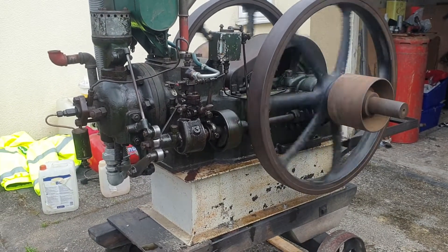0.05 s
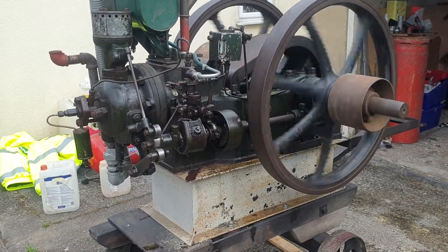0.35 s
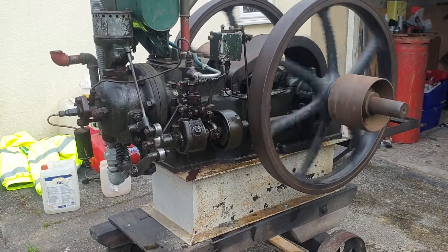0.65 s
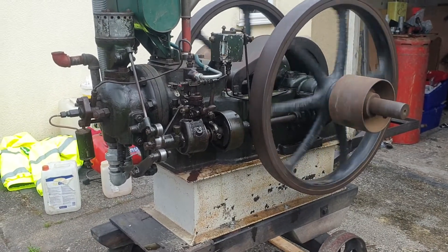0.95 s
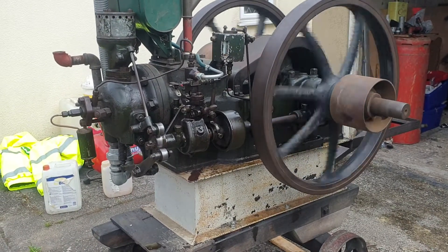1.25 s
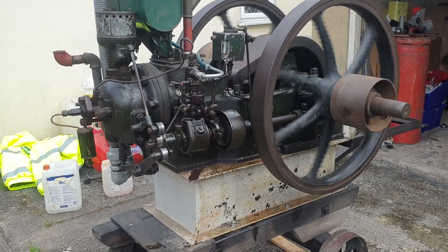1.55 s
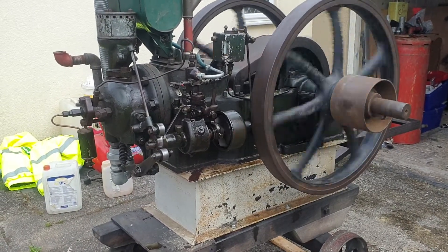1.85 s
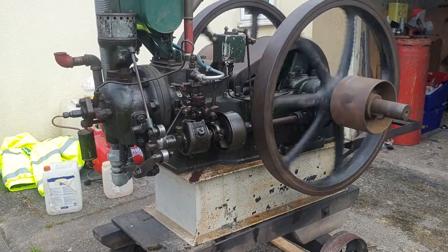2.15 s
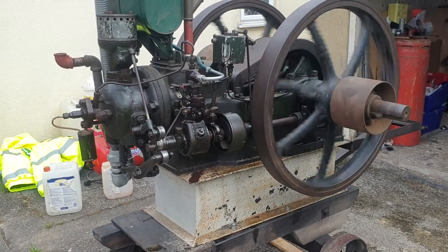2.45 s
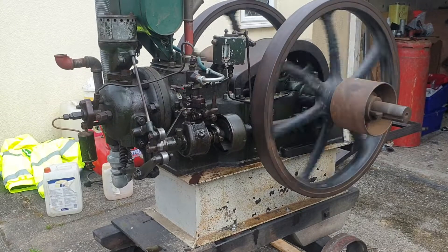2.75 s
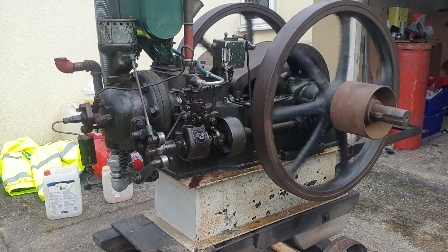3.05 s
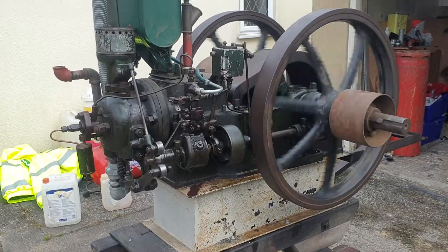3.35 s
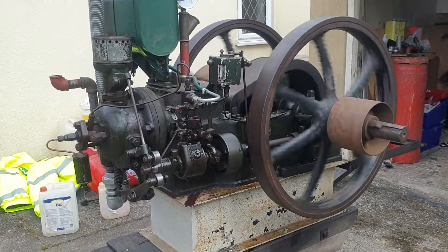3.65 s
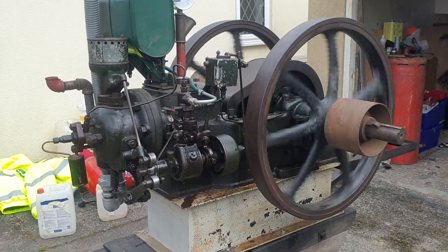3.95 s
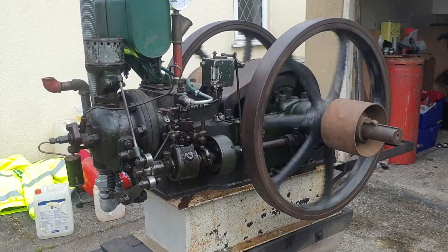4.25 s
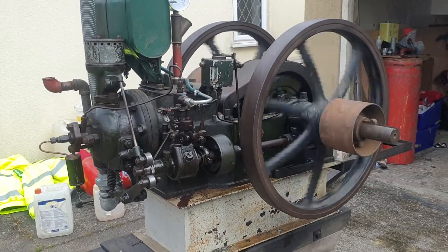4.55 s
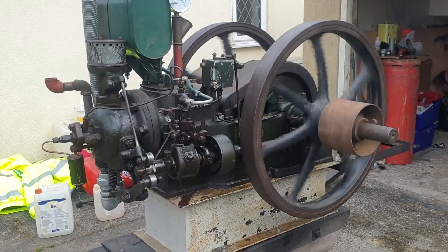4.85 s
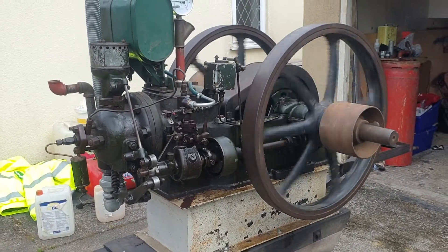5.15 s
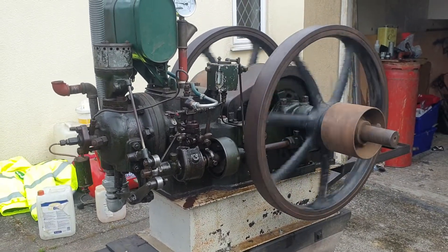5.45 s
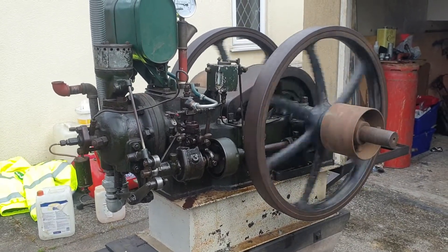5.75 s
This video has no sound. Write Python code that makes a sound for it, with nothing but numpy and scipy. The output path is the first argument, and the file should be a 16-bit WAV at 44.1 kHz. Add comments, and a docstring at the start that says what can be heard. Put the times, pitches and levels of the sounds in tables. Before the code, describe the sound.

Close to the microphone, a stationary diesel engine chugs at a steady idle from start to finish. Its single cylinder repeats a quick pattern of ringing knock, exhaust chuff, intake gulp and clunk, over a continuous rattle and small steel clinks. Now and then one firing knocks harder than the others. The sound sits slightly left, with light reflections from the surrounding yard.

```python
"""An old single-cylinder four-stroke diesel idles evenly, close by, in a yard.
Each cycle: the firing knocks the iron frame; the exhaust valve opens with a thud, gas rushes out
through the pipe and the valve shuts; the inlet gulps and hisses; its valve seats with a clunk.
Throughout, the gear clicks, rattles and clinks, the knock swells and eases as the governor hunts,
and the walls throw it all back."""
import sys
import numpy as np
from scipy import signal
from scipy.fft import rfft, irfft, next_fast_len
from scipy.io import wavfile
from scipy.ndimage import uniform_filter1d

SR = 44100
rng = np.random.default_rng(int(sys.argv[2]) if len(sys.argv) > 2 else 0)


def to_wav(s):
    """Save 16-bit WAV."""
    ch = np.atleast_2d(s).T  # columns
    pcm = np.round(np.clip(ch, -1, 1) * 32767)  # PCM
    wavfile.write(sys.argv[1], SR, pcm.astype(np.int16))


N = 265041
TAPS = 8192
HZ = np.fft.rfftfreq(TAPS, 1 / SR)
AGE_S = np.arange(SR // 2) / SR
RPM = 409.48  # held by the flywheels
CYCLE_S = 2 * 60 / RPM  # one firing in two turns
FIRINGS_S = np.arange(-.0452, N / SR, CYCLE_S)

# Resonances of rods, rockers and springs. Each row: centre in Hz, width in Hz, peak in dB.
STEEL_PEAKS = [(2170, 66, -0.5), (2870, 27, -1), (3270, 28, 10), (3770, 59, 6), (4340, 80, -1),
               (5460, 108, 2.5), (7220, 600, 7.5), (11400, 590, 4.5)]


def amp(db):
    """Decibels to gain."""
    return 10 ** (np.asarray(db) / 20)


def curve(points, hz=HZ):
    """Interpolate a table over log frequency."""
    points_hz, values = np.transpose(points)
    return np.interp(np.log(hz + 1), np.log(points_hz + 1), values)


def add(mix, start_s, sound):
    """Mix a sound in, cut to fit."""
    start = round(start_s * SR)
    sound = sound[max(-start, 0):]
    part = mix[max(start, 0):][:len(sound)]
    part += sound[:len(part)]


def delayed(x, delay_s):
    """Delay by whole samples."""
    return np.interp(np.arange(N) - round(delay_s * SR), np.arange(N), x)


def colour(x, gain):
    """Minimum-phase filter with the given gain at each of HZ."""
    log_gain = np.log(np.maximum(np.r_[gain, gain[-2:0:-1]], 1e-5))
    taps = np.fft.ifft(np.exp(np.conj(signal.hilbert(log_gain)))).real
    return signal.oaconvolve(x, taps[:TAPS // 2])[:len(x)]


def resonant(broad_db, peaks):
    """Broad spectrum with resonances standing on it, at unit power."""
    peak_power = sum(amp(db) ** 2 / (1 + (2 * (HZ - hz) / width_hz) ** 2) for hz, width_hz, db in peaks)
    gain = amp(broad_db) * np.sqrt(1 + peak_power)
    return gain / np.sqrt(np.mean(gain ** 2))


def ring(modes, phases, rise_s, scatter_db):
    """One blow on damped modes, each at a slightly random level."""
    hz, db, t60_s = np.transpose(modes)[:, :, None]
    decay = amp(db + scatter_db * rng.standard_normal(db.shape) - 60 * AGE_S / t60_s)
    return (decay * np.cos(2 * np.pi * hz * AGE_S + phases)).sum(0) * (1 - np.exp(-AGE_S / rise_s))


def swell(full_s, db, attack_db_per_s, hold_s, release_db_per_s):
    """Attack, hold and release, as gain over the time since a firing."""
    early_s, late_s = np.maximum(full_s - AGE_S, 0), np.maximum(AGE_S - full_s - hold_s, 0)
    return amp(db - attack_db_per_s * early_s - release_db_per_s * late_s)


def scatter(spread_db):
    """A random level in dB per cycle."""
    return spread_db * rng.standard_normal(len(FIRINGS_S))


def lumpy_noise(envelope, levels_db, grain_db, repeat_share):
    """One grainy burst per cycle; a share of the noise is the same each time."""
    out = np.zeros(N)
    repeated = rng.standard_normal(len(AGE_S))
    for firing_s, db in zip(FIRINGS_S, levels_db):
        fresh, lumps = rng.standard_normal((2, len(AGE_S)))
        lumps = uniform_filter1d(lumps, size=40)
        lumps = amp(grain_db * lumps / lumps.std())
        noise = np.sqrt(repeat_share) * repeated + np.sqrt(1 - repeat_share) * fresh
        add(out, firing_s, amp(db) * envelope * noise * lumps / np.sqrt(np.mean(lumps ** 2)))
    return out


def yard(x, first_s=.003, echoes_per_s=3000):
    """Scattered reflections from ground, walls and garage, different at each microphone port."""
    # Reverberation time. Each row: frequency in Hz, T60 in seconds.
    reverb_t60_s = [(100, 1.0), (1000, .8), (2500, .38), (12000, 0.33)]
    # Reflection strength. Each row: frequency in Hz, level in dB.
    reflection_db = [(100, -40), (300, -15), (1000, -11), (3000, -14.5), (12000, -14)]
    shape = (2, len(AGE_S))
    echoes = rng.standard_normal(shape) * (rng.random(shape) < echoes_per_s / SR) * (AGE_S > first_s)
    hz, time_s, spectra = signal.stft(echoes, SR, nperseg=256)
    decay = amp(-60 * time_s / curve(reverb_t60_s, hz)[:, None])
    decay *= amp(curve(reflection_db, hz))[:, None] / np.sqrt(np.mean(decay ** 2, 1, keepdims=True))
    tail = signal.istft(spectra * decay, SR, nperseg=256)[1] / np.linalg.norm(echoes[0])
    return signal.fftconvolve(x[None], tail, axes=1)[:, :N]


def gear_shake(tremble_db=-44):
    """Envelope of one cycle: jolts die away over a steady tremble."""
    # Jolts from firing, exhaust tappet, inlet tappet and closing inlet valve. Each row: seconds
    # after firing, level in dB, attack in dB/s, hold in seconds, release in dB/s.
    jolts = [(0.0, -22, 6000, .006, 135), (.072, -22.8, 330, .004, 240), (.15, -27.5, 60, .012, 150),
             (.238, -30.5, 900, .008, 480)]
    tremble = amp(tremble_db) * (AGE_S < CYCLE_S)
    return np.sqrt(tremble ** 2 + sum(swell(*jolt) ** 2 for jolt in jolts))


def gear_rattle(gain_db=-1.4):
    """Loose gears and rods rattle all round the cycle."""
    # Broad rattle spectrum. Each row: frequency in Hz, relative level in dB.
    rattle_db = [(30, -1), (130, 4.5), (450, 5.5), (650, -0.5), (1000, 1), (1500, -5), (2600, -4),
                 (4000, -8), (5600, -6), (7500, -18), (9000, -19.5), (16000, -31.5)]
    chatter = lumpy_noise(gear_shake(), np.full(len(FIRINGS_S), gain_db), grain_db=2, repeat_share=.15)
    return colour(chatter, resonant(curve(rattle_db), STEEL_PEAKS))


def steel_clinks(hits_per_s=26, scatter_db=3):
    """Small parts are struck at random, hardest during jolts; each rings at its own pitch."""
    # Small steel parts. Each row: pitch in Hz, level in dB, T60 in seconds.
    parts = [(2885, -29, .05), (3256, -28, .05), (3735, -24, .11), (3838, -24, .1), (4350, -28, .05),
             (5450, -27, .05), (5680, -25, .07), (10900, -29, .025)]
    force, out, shake = np.zeros(N), np.zeros(N), gear_shake()
    for firing_s in FIRINGS_S:
        add(force, firing_s, (shake / shake.max()) ** 1.6)
    for hz, db, t60_s in parts:
        hits = force * (rng.random(N) < hits_per_s / SR)
        hits *= amp(scatter_db * np.clip(rng.standard_normal(N), -2, 2))
        clink = amp(db - 60 * AGE_S / t60_s) * np.sin(2 * np.pi * hz * AGE_S)
        out += signal.oaconvolve(hits, clink)[:N]
    return out


def gear_clicks(parts_db, scatter_db=1, rise_s=.00084, cutoff_hz=13000):
    """Pump, tappets and valves click at fixed crank angles."""
    # Clicks. Each row: seconds after firing, relative level in dB, centre in Hz, width in octaves,
    # T60 in seconds, part whose strength it follows.
    clicks = [(-.0022, -23.5, 5800, 1.1, .04, "knock"), (.001, -21, 1100, 0.35, 0.13, "knock"),
              (.021, -21.5, 4000, 0.54, 0.026, "valve"), (.028, -35, 11000, 0.334, .025, "tappet"),
              (0.0692, -18, 3800, 0.28, 0.036, "tappet"), (0.1449, -23, 10700, 0.4, 0.056, "valve"),
              (0.2314, -15.8, 7400, 0.8, 0.031, "valve"), (.235, -27, 4500, 1.9, 0.048, "valve"),
              (0.273, -30.5, 3560, 0.4, 0.054, "tappet")]
    out, age_s = np.zeros(N), AGE_S[:TAPS]
    lowpass_db = -10 * np.log10(1 + (HZ / cutoff_hz) ** 16)
    for delay_s, db, hz, octaves, t60_s, part in clicks:
        hits = np.zeros(N)
        envelope = amp(db - 60 * age_s / t60_s) * (1 - np.exp(-age_s / rise_s))
        for firing_s, part_db in zip(FIRINGS_S, parts_db[part]):
            strength = amp(part_db + scatter_db * rng.standard_normal())
            add(hits, firing_s + delay_s, strength * envelope * rng.standard_normal(TAPS))
        band_db = -20 * np.log10(1 + (np.log2((HZ + 1) / hz) / octaves) ** 2 / 2)
        out += colour(hits, resonant(band_db + lowpass_db, STEEL_PEAKS))
    return out


def inlet_clunk(delay_s=.231):
    """The inlet valve drops onto its seat and rings the casting."""
    # Casting modes. Each row: frequency in Hz, level in dB, T60 in seconds.
    modes = [(119.4, -25, 0.22), (184, -30, 0.27), (250.3, -28, 0.28), (494.5, -33, 0.16),
             (622.4, -28, .08), (915, -35, .08), (2219.5, -28, 0.054)]
    out, phases = np.zeros(N), rng.uniform(0, 2 * np.pi, (len(modes), 1))
    for firing_s in FIRINGS_S:
        add(out, firing_s + delay_s, ring(modes, phases, rise_s=.00064, scatter_db=3))
    return out


def gas_flow(flow_db, crossover_hz=2600):
    """The piston drives gas out through the pipe, then draws air in."""
    # Resonances of pipe and cylinder head. Each row: centre in Hz, width in Hz, peak in dB.
    pipe_peaks = [(400, 53, 8), (600, 13, 7.5), (735, 20, 18.3), (847.5, 22, 18), (936, 38, 17.3),
                  (1072, 28, 17), (1272, 29, 11), (1417, 24, 9), (1875, 35, 11), (1995, 55, 11.8),
                  (2217, 52, 11), (2380, 33, 7.5), (3403, 19, 9), (3550, 23, 10), (4070, 23, 5),
                  (4330, 35, 7.5), (5575, 63, 11)]
    # Broad spectra of the two flows. Each row: frequency in Hz, relative level in dB.
    exhaust_db = [(40, -26), (130, -3), (300, -2.5), (550, -8), (850, -7), (1650, -7), (2900, -6.5),
                  (3700, -0.5), (4900, -5.5), (6300, -7), (7200, -4.5), (9300, -18.5), (11500, -19.5),
                  (16000, -35)]
    inlet_db = [(40, 7), (150, 1.5), (550, -0.5), (1000, -20.5), (1700, -6.5), (2800, 0), (4200, 5.5),
                (6000, -5.5), (7500, 5), (9000, -12), (11300, -4.5), (16000, -26)]
    exhaust = swell(full_s=.118, db=-12.4, attack_db_per_s=720, hold_s=.016, release_db_per_s=590)
    inlet = swell(full_s=.172, db=-25.3, attack_db_per_s=600, hold_s=.025, release_db_per_s=700)
    pipe = resonant(curve(exhaust_db), pipe_peaks)
    intake = resonant(curve(inlet_db), pipe_peaks)
    low_share = 1 / (1 + (HZ / crossover_hz) ** 4)
    pipe_low, pipe_high = pipe * np.sqrt(low_share), pipe * np.sqrt(1 - low_share)
    roar = colour(lumpy_noise(exhaust, flow_db, grain_db=1.64, repeat_share=.12), pipe_low)
    jet = colour(lumpy_noise(exhaust, flow_db, grain_db=2, repeat_share=.098), pipe_high)
    hiss = colour(lumpy_noise(inlet, flow_db, grain_db=2.3, repeat_share=.05), intake)
    # The late jet brightens the rush as the valve gap narrows.
    return roar + delayed(jet, delay_s=.005) + hiss


def puff(delay_s, width_s, push_db, lean, column, column_db, lead_s):
    """A valve moves: one pressure swing, and the air column rings from lead_s before its centre."""
    out, centre_s = np.zeros(N), .01
    widths = (AGE_S - centre_s) / width_s
    swing = -widths * np.exp((1 - widths ** 2) / 2 - lean * widths)  # lean favours the first half
    for firing_s in FIRINGS_S:
        add(out, firing_s + delay_s - centre_s, amp(push_db) * swing)
        ringing = ring(column, phases=0, rise_s=.0025, scatter_db=1.1)
        add(out, firing_s + delay_s - lead_s, amp(column_db) * ringing)
    return out


def inlet_gulp():
    """The inlet valve opens and sets its air column ringing."""
    # Inlet air column modes. Each row: frequency in Hz, relative level in dB, T60 in seconds.
    modes = [(77.4, -22.5, 0.3), (95, -27, 0.27), (126.48, -33.5, 0.35), (167.2, -20.5, 0.38),
             (220.7, -18, 0.11), (244, -24, 0.17), (272, -29, 0.074)]
    return puff(delay_s=.1514, width_s=.00094, push_db=-8.5, lean=.25,
                column=modes, column_db=.5, lead_s=.0011)


def exhaust_thuds():
    """The exhaust valve opens, then shuts more softly with the opposite pressure swing."""
    # Exhaust air column modes. Each row: frequency in Hz, relative level in dB, T60 in seconds.
    modes = [(74.4, -21.5, 0.128), (118.5, -31.5, 0.45), (230, -17.5, 0.093)]
    opening = puff(delay_s=.0662, width_s=.0011, push_db=-13.5, lean=.23,
                   column=modes, column_db=-2.8, lead_s=.0012)
    closing = puff(delay_s=.1437, width_s=.00092, push_db=-20, lean=0,
                   column=modes, column_db=-4.5, lead_s=.0014)
    return closing - opening


def firing_strength(base_db=-3, hunt_db=2.4, hunt_period_s=2.44, most_fuel_s=2.4):
    """Level of each firing in dB: the governor hunts slowly, with a sharper knock now and then."""
    # Harder firings. Each row: time in seconds, extra level in dB.
    hard_knocks = [(.248, 2.5), (.834, 3), (1.42, 5.5), (2.299, 4), (2.885, 6.5), (3.178, 6), (4.057, 4.3),
                   (4.643, 2.5), (5.23, 4.5)]
    governor_db = hunt_db * np.cos(2 * np.pi * (FIRINGS_S - most_fuel_s) / hunt_period_s)
    extra_db = sum(db * (abs(FIRINGS_S - time_s) < CYCLE_S / 2) for time_s, db in hard_knocks)
    return base_db + governor_db + extra_db + scatter(spread_db=.7)


def firing_knock(firing_db, gain_db=-.6, jitter_rad=.27):
    """Each firing strikes the frame nearly alike; a sharper one mostly feeds the upper modes."""
    # Modes of iron frame and base. Each row: frequency in Hz, relative level in dB, T60 in seconds.
    frame = [(115, -28.5, 0.28), (162.3, -27, 0.27), (235, -22.5, 0.35), (278, -19.8, 0.18),
             (352, -19.5, 0.11), (402.4, -22, 0.27), (447, -18.5, 0.3), (490.2, -30, 0.2), (620, -27, 0.2),
             (689, -25, 0.14), (761, -23.5, .13), (890, -27, 0.18), (971, -16.5, 0.11), (1060, -21.5, 0.21),
             (1132.6, -20, 0.08), (1391, -24.5, 0.1), (1544, -25, 0.1)]
    out, phases = np.zeros(N), rng.uniform(0, 2 * np.pi, (len(frame), 1))
    mode_hz = np.transpose(frame)[0]
    sensitivity = (mode_hz / mode_hz[-1]) ** .84
    for firing_s, db in zip(FIRINGS_S, firing_db):
        modes = np.array(frame)
        modes[:, 1] += db * sensitivity
        jitter = jitter_rad * rng.standard_normal(phases.shape)
        add(out, firing_s, ring(modes, phases + jitter, rise_s=.0044, scatter_db=1.04))
    return amp(gain_db) * out


def two_ports(near, far):
    """The engine is large and close: the left port hears its near side, the right both sides."""
    # Left-right likeness. Each row: frequency in Hz, correlation from 0 to 1.
    likeness = [(100, 1), (400, 0.96), (1000, 0.89), (3000, 0.2), (12000, 0.13)]
    size = next_fast_len(N)
    alike = curve(likeness, np.fft.rfftfreq(size, 1 / SR))
    blend = alike * rfft(near, size) + np.sqrt(1 - alike ** 2) * rfft(far, size)
    return np.array([near, irfft(blend, size)[:N]])


def scene():
    """The four strokes, in the yard."""
    puffs = exhaust_thuds() + inlet_gulp()
    firing_db, flow_db = firing_strength(), scatter(spread_db=.4)
    parts_db = {"knock": firing_db, "tappet": scatter(spread_db=1.3), "valve": scatter(spread_db=.6)}
    near, far = (amp(-.75) * (gas_flow(flow_db) + gear_rattle() + gear_clicks(parts_db))
                 for _ in range(2))
    engine = firing_knock(firing_db) + puffs + inlet_clunk() + steel_clinks() + two_ports(near, far)
    return engine + yard(engine[0])


def record(dry, lag_s=.00013, low_cut_hz=30, high_cut_hz=15850):
    """Sound reaches the right port later and duller; both ports are band-limited."""
    # Shading of the right port by the camera body. Each row: frequency in Hz, loss in dB.
    shade_db = [(60, 5.5), (130, 3.5), (290, 5.0), (640, 4.5), (1410, 6.5), (3100, 10.5), (6820, 19.5),
                (15000, 0)]
    right = delayed(colour(dry[1], amp(-curve(shade_db))), lag_s)
    highpass = signal.butter(2, low_cut_hz, "high", fs=SR, output="sos")
    lowpass = signal.firwin(255, high_cut_hz, window=("kaiser", 8), fs=SR)
    ports = signal.sosfiltfilt(highpass, np.array([dry[0], right]))
    return signal.oaconvolve(ports, lowpass[None], "same")


dry = scene()
out = record(dry)
to_wav(out)
```